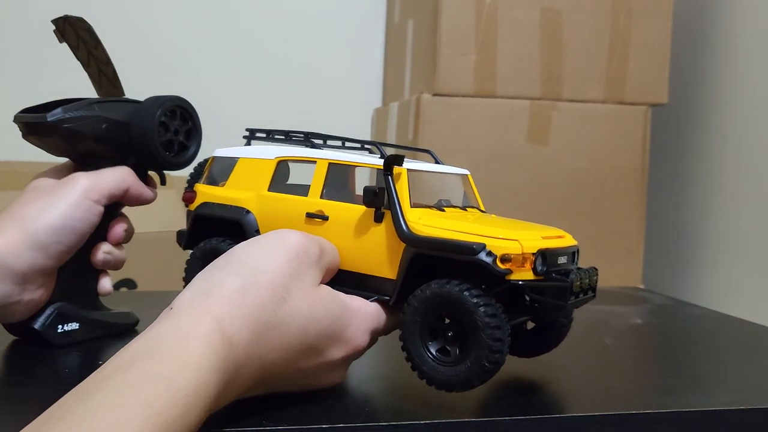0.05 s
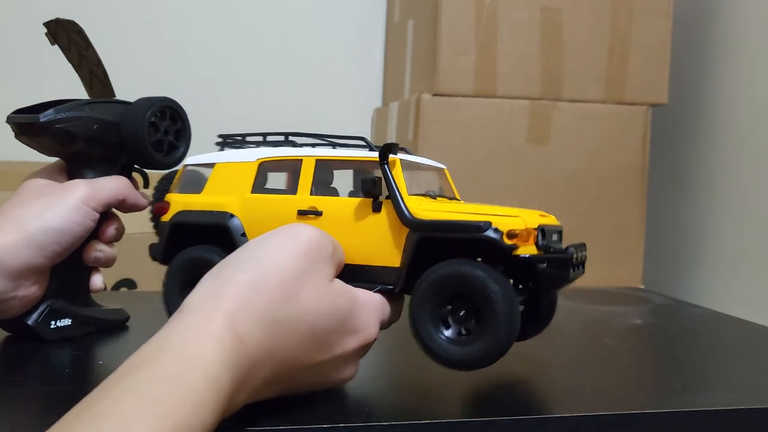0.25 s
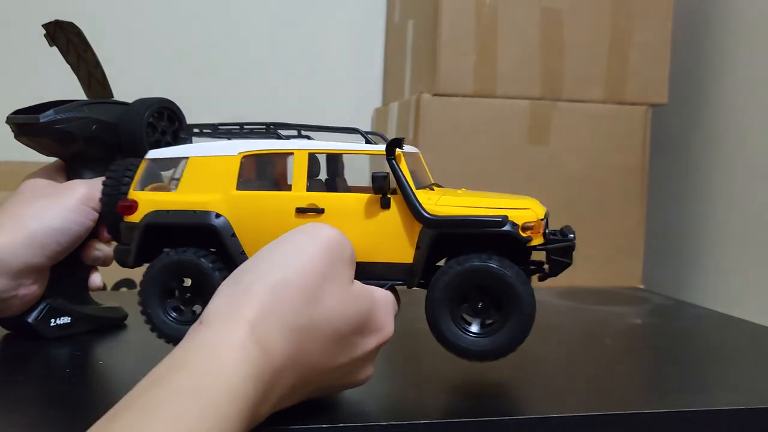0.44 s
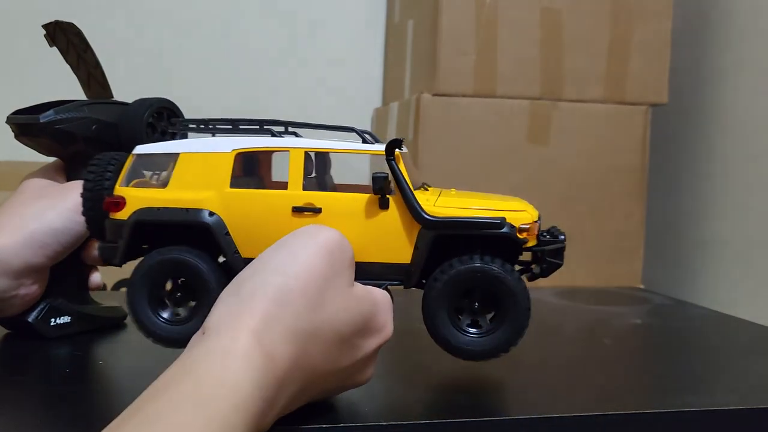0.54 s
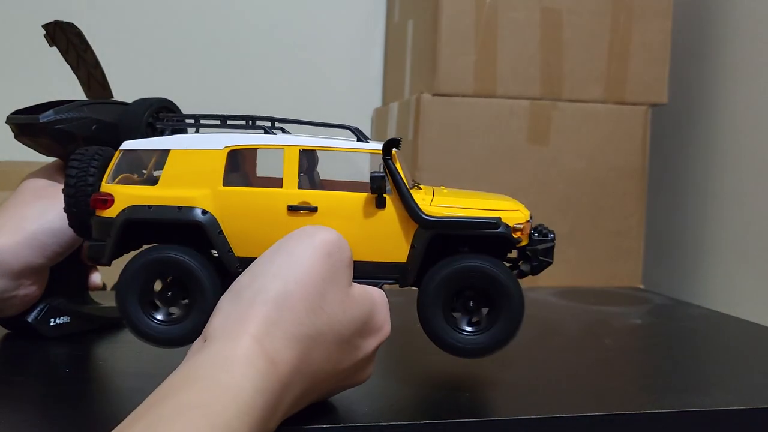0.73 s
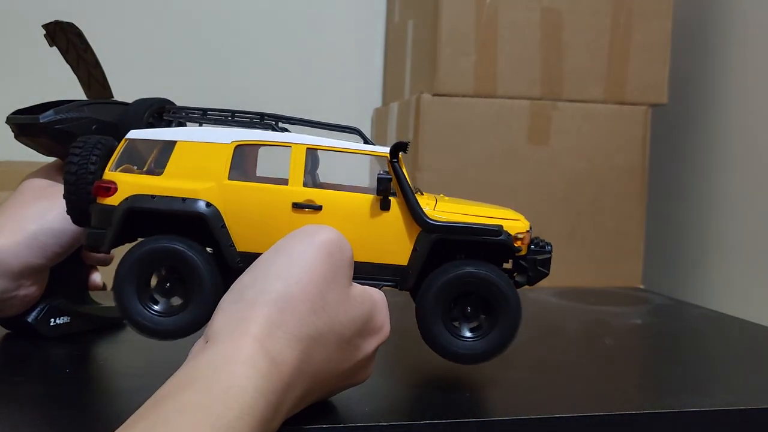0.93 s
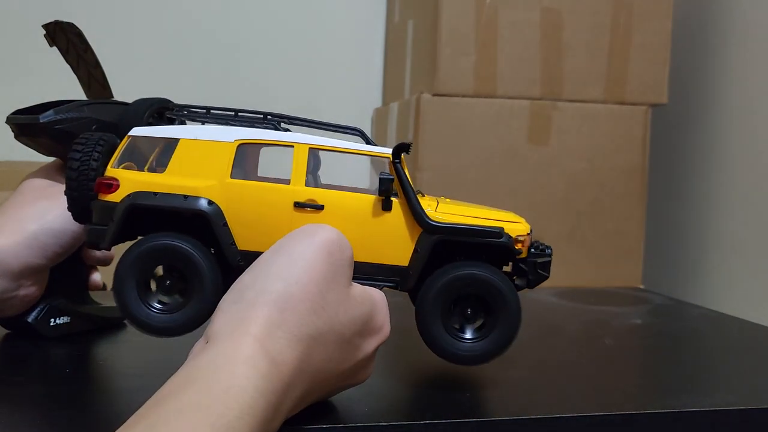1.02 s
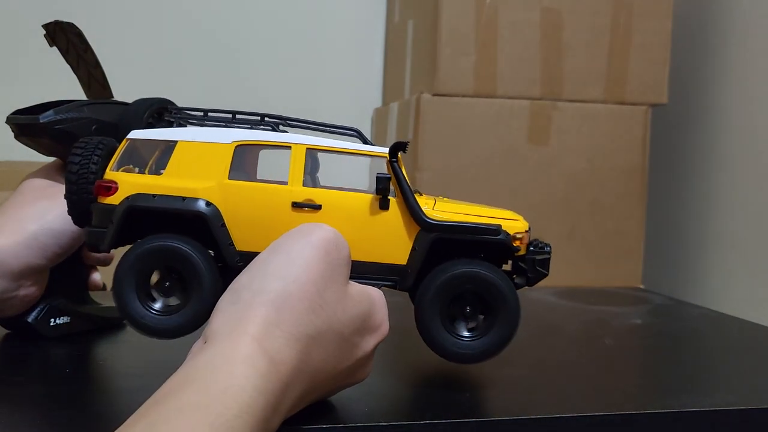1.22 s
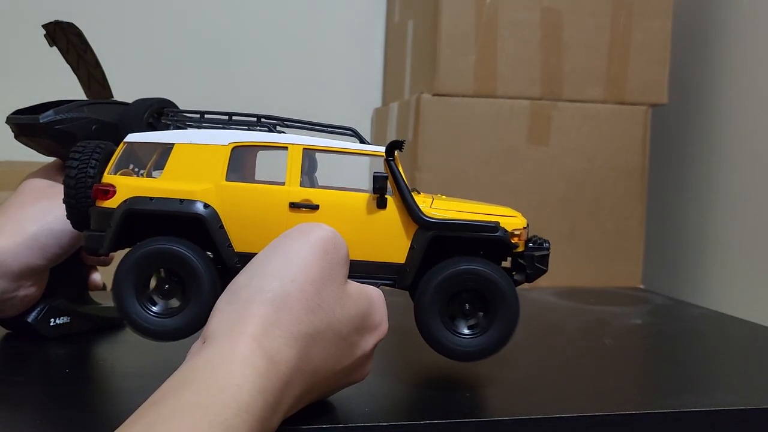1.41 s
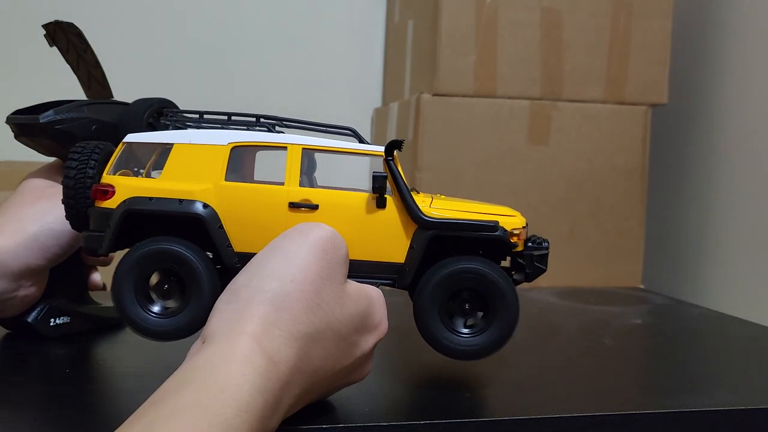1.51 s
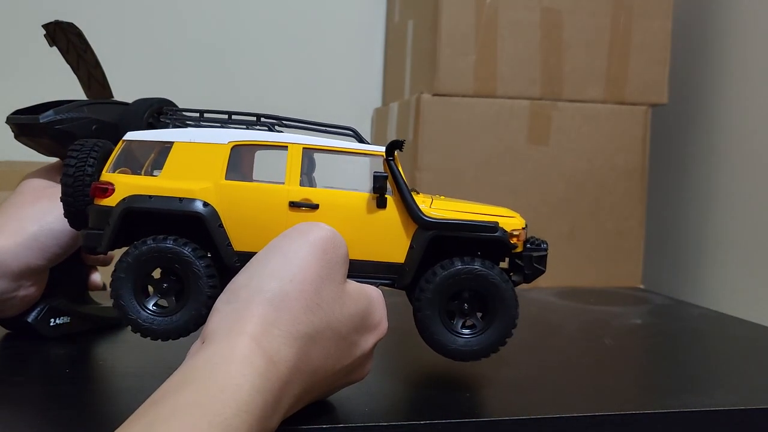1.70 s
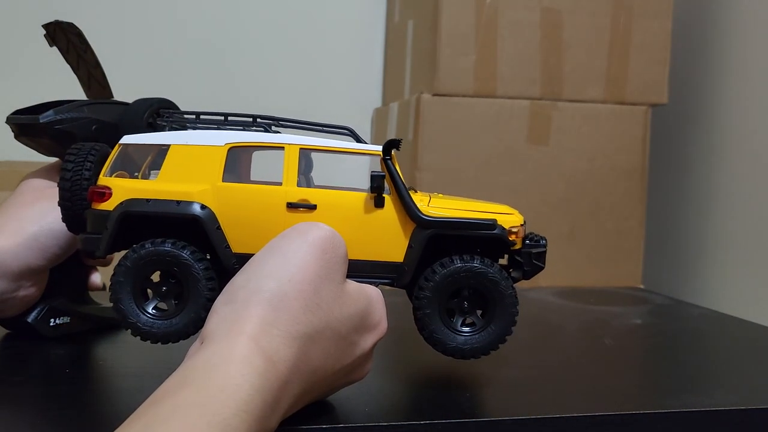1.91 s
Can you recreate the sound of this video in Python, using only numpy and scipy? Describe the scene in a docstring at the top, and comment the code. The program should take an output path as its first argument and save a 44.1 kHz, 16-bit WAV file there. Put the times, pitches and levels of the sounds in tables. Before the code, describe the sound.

After a brief quiet room hum and soft knock, a small toy truck motor whirs up in three rising steps with raspy plastic gear rattle, holds a bright whine, then coasts down to near silence, close indoors.

```python
"""The motor of a small toy truck, held in the air indoors, runs up in three throttle steps and coasts down.
Sines at multiples of the shaft speed give its hum and the whine of a ten-tooth pinion;
noise coloured by the resonances of the plastic shell gives the gear rattle, and damped sines a soft knock.
A mains hum and noise rumble of the room lie below, and the motor stirs again at the very end."""
import sys
import numpy as np
from scipy import signal
from scipy.fft import rfft, irfft
from scipy.io import wavfile
from scipy.ndimage import uniform_filter1d

SR = 44100
rng = np.random.default_rng(int(sys.argv[2]) if len(sys.argv) > 2 else 0)


def master_out(mix):
    """Clip the mix to full scale and print it as 16-bit PCM to the path in sys.argv[1]."""
    frames = np.transpose(np.atleast_2d(mix))
    ceiling = np.clip(frames, -1, 1)
    pcm = np.round(ceiling * 32767).astype(np.int16)
    wavfile.write(sys.argv[1], SR, pcm)


N = 85995
TIME_S = np.arange(N) / SR

# Room rumble spectrum: (frequency [Hz], relative density [dB per Hz])
RUMBLE_SPECTRUM = [(20, -34), (40, -20), (60, -8.5), (85, -17), (123, -6), (170, -18.5), (290, -10),
                   (450, -28), (800, -27.5), (1200, -33), (1800, -38.5), (2500, -30), (3500, -38.5),
                   (5500, -35.5), (9000, -36.5), (15900, -49.5)]
# Room rumble: (time [s], level [dB])
RUMBLE_LEVEL = [(0, -66), (.06, -59), (.3, -65), (1.6, -62), (1.8, -71), (1.95, -81)]
# Low modes of the knocked shell: (frequency [Hz], relative level [dB], 60 dB decay time [s])
KNOCK_MODES = [(284.4, 3.5, 0.34), (452, 8, 0.12), (793, 7, 0.092)]
# Rotor: (time [s], shaft speed [Hz], first order [dB], second order [dB], fourth order [dB]), before lean and blur
SHAFT = [(0.19, 110.3, -83, -66, -86), (0.256, 173.9, -67, -60, -46), (0.288, 179.4, -63, -79, -49),
         (0.308, 196.5, -63, -79, -49), (0.36, 199, -69, -95, -61), (0.414, 175.7, -74, -79, -46.5),
         (0.445, 127.4, -80, -62.5, -52), (0.55, 126.3, -100, -61, -56.5), (0.606, 229.2, -61, -74, -50),
         (0.63, 259.4, -51, -45, -66), (0.71, 271.6, -51.5, -44, -53), (0.79, 263, -50.5, -42.5, -57),
         (0.834, 240.7, -56.5, -54, -50), (0.88, 243.1, -64, -44.5, -58.5), (0.938, 241.9, -58, -91, -59),
         (0.96, 250.6, -52.5, -49, -55), (1.011, 326, -53, -48, -58.5), (1.022, 349.1, -39.5, -35, -72),
         (1.045, 366.4, -35, -43.5, -60), (1.056, 380.4, -36.5, -35, -54.5), (1.172, 379.2, -38, -35, -63),
         (1.592, 378.1, -36, -35.5, -58.5), (1.612, 352, -35, -44, -61), (1.622, 344.6, -61, -46, -52),
         (1.637, 346.3, -42, -37.5, -52), (1.646, 320, -60, -63, -52), (1.685, 246.9, -62, -50.5, -64),
         (1.71, 225.2, -82, -66, -80), (1.758, 199.2, -99, -69, -95)]
# Gear noise: (time [s], reference level [dB], low-mid level relative to it [dB])
GEAR_LOAD = [(0.192, -56.5, -2), (0.216, -47.5, 1.5), (0.25, -40.5, -3), (0.342, -43.5, -1.5),
             (0.494, -54, 3.5), (0.554, -50, 2.5), (0.572, -38, -8.5), (0.592, -40.5, -1), (0.608, -36, -6),
             (0.622, -40, -4), (0.91, -42, -9.5), (0.97, -39, -4), (1.034, -36, -10.5), (1.092, -41, -8),
             (1.234, -39, -10), (1.258, -41.5, -9), (1.606, -39, -7.5), (1.656, -43, -1.5),
             (1.802, -79.5, 2), (1.9, -82.5, -12), (1.934, -77, 8.5), (1.95, -62, -1.5)]
# Higher shaft orders: (multiple [-], part throttle [dB re gear reference], full throttle [dB re gear reference])
UPPER_ORDERS = [(3, -17, -30), (5, -19, -28), (6, -25, -20), (7, -19, -28), (8, -18, -28), (10, -14, -16),
                (10.5, -34, -23), (11, -22, -21), (12, -28, -22), (13, -32, -17), (14, -30, -21),
                (14.33, -34, -17), (15.67, -34, -23), (17, -27, -16), (20, -14, -11), (21, -23, -30),
                (22, -20, -28), (24, -22, -16), (24.33, -30, -21), (25, -28, -20), (26, -23, -28),
                (30, -20, -36), (39, -26, -25), (40, -30, -23), (41, -30, -27)]
# Prominence added to the higher orders: (time [s], other orders [dB], order ten [dB], order twenty [dB])
MESH_PROMINENCE = [(.2, -5, 0, -8), (.3, 0, 10.5, -9), (.36, 2, 6, -4), (.43, -15, -12, -4),
                   (.55, -16, -8, -8), (.62, 2, 11, -2), (.68, -3, 2, -0.5), (.79, 5, 12, 18),
                   (.84, 3, 13.5, -17), (.95, 4.5, 11.5, -13), (1.07, 1.5, 5.5, 1), (1.9, 3.5, 9, -3.5)]
# Noise around the tooth-mesh orders: (multiple [-], level at steady speed [dB re gear reference])
MESH_HISS = [(10, -25), (20, -11), (30, -21)]
# Gear rattle spectrum ahead of the shell: (frequency [Hz], relative density [dB per Hz])
RATTLE_SPECTRUM = [(530, -42), (900, -7), (1790, -2), (2060, -2), (2820, -7), (3670, -6.5), (4350, -8.5),
                   (7290, -2), (8320, -8), (9390, -5.5), (11900, -15), (15200, -20.5), (15900, -10.5)]
# Low drive-train rattle spectrum ahead of the shell: (frequency [Hz], relative density [dB per Hz])
GROWL_SPECTRUM = [(200, -9.5), (260, -5), (500, 4), (950, -4), (1300, -41)]
# Low drive-train rattle: (time [s], level [dB])
GROWL_LEVEL = [(0, -71.5), (.09, -70.5), (.18, -59), (.25, -45), (.35, -49.5), (.45, -55), (.55, -53.5),
               (.6, -45.5), (.7, -56), (.9, -57.5), (1, -49), (1.1, -52.5), (1.6, -51), (1.66, -44),
               (1.75, -66), (1.9, -95), (1.95, -64.5)]
# Shell resonances: (frequency [Hz], width [Hz], relative strength [dB])
SHELL_MODES = [(240, 37, -10.5), (305.5, 17, 1), (438.6, 18.6, 4), (529.3, 17, -2), (695, 16.7, 0.5),
               (769, 51, 0), (1850, 16, -9), (2090, 27, 0.5), (2654, 32, -3.5), (3290, 22, -4),
               (5290, 140, -2), (6410, 71, -4), (6950, 67, -4.5), (8900, 380, -20)]
# Stereo noise: (frequency [Hz], left-right correlation [-])
LIKENESS = [(60, 0.72), (500, 0.96), (1000, 0.05), (5000, 0.019), (15000, 0.043)]
# Stereo balance: (frequency [Hz], left minus right [dB])
LEFT_LEAN = [(60, -1), (130, -5), (290, 6), (640, -3), (1410, 1), (3100, 0), (6820, 4), (15000, -4.5)]

HUM_HZ, HUM_DB, HUM_WAVER_DB = 119.5, 0.5, 1.5  # peak level relative to rumble rms
ROOM_T60_S, ROOM_DB = 0.3, -12
KNOCK_S, KNOCK_DB, KNOCK_RISE_S = 0.081, -53.5, 0.02
START_S, START_RISE_S, STIR_S = 0.19, 0.0025, 0.036  # the gears catch; their lower rattle stirs earlier
RESTART_S, RESTART_HZ, RESTART_DB, RESTART_RISE_S = 1.92, 243, -72, 0.03
HALF_HZ, FULL_HZ = 270, 370  # shaft speeds of part and full throttle
SPEED_JITTER = 0.00086  # relative spread of shaft speed
FIRST_LEAD_RAD, LOW_LEAD_RAD = 0.25, 0.3  # left leads on order one, and on orders two and four
TONE_SPREAD_RAD = 1.9  # left-right phase scatter of the higher orders
UPPER_DB, RASP_DB = 0.5, -28  # trim of all higher orders; orders 33 to 38 at full throttle, before it
BLUR_DB_S = 3.5  # loss per unit of relative speed change a second
WAVER_DB, WAVER_PER_S = 3, 16
LINE_ROUGH, ROUGH_PER_S = 0.8, 60  # quick flutter that widens the higher orders
MESH_HISS_HZ, HISS_GAIN_DB_S = 160, 1.6  # modulator rate; swell with relative speed change a second
GATE_DEPTH = 0.077  # modulation of the rattle once per turn
CUTOFF_HZ = 15680


def amp(db):
    """A level in decibels is twenty times the logarithm of amplitude."""
    return 10 ** (np.asarray(db) / 20)


def unit(x):
    """Division by the root mean square gives unit effective value."""
    return x / np.sqrt(np.mean(x ** 2) + 1e-20)


def in_time(rows):
    """Linear interpolation turns each column into a continuous time course."""
    seconds, *columns = np.transpose(rows)
    return [np.interp(TIME_S, seconds, column) for column in columns]


def at_hz(points, hz):
    """Values are interpolated on a logarithmic frequency axis."""
    table_hz, values = np.array(points).T
    return np.interp(np.log(hz), np.log(table_hz), values)


def drift(rate):
    """Two-pole low-passed noise wanders at random with unit spread."""
    step = 40  # samples between computed points
    pole = np.exp(-2 * np.pi * rate * step / SR)
    noise = rng.standard_normal(N // step + 1002)
    slow = signal.lfilter([1], [1, -2 * pole, pole * pole], noise)[1000:]
    return np.interp(np.arange(N) / step, np.arange(len(slow)), unit(slow))


def lean(hz):
    """A level difference between channels sets the left and right gains at a frequency."""
    return amp(at_hz(LEFT_LEAN, hz) * np.array([[0.5], [-0.5]]))


def shell_gain(f):
    """Resonances add as Lorentzian power peaks to the direct sound of the shell."""
    power = 1
    for hz, width, db in SHELL_MODES:
        power = power + amp(2 * (db + 9.5)) / (1 + (2 * (f - hz) / width) ** 2)
    return np.sqrt(power)


def coloured(spectrum, low, high, resonant, excite=1.0):
    """Spectral weighting of white noise gives partly correlated stereo noise of unit rms."""
    white = rng.standard_normal((2, N)) * excite
    f = np.maximum(np.fft.rfftfreq(N, 1 / SR), 1)
    gain = amp(at_hz(spectrum, f))
    if resonant:
        gain = gain * shell_gain(f)
    alike = np.clip(at_hz(LIKENESS, f), 0, 1)
    mid, side = rfft(white) * gain
    common = np.sqrt(1 + alike) * mid
    opposed = np.sqrt(1 - alike) * side * np.array([[1], [-1]])
    in_band = (f >= low) & (f < high)
    return unit(irfft((common + opposed) * lean(f) * in_band, N))


def tones(turns, order, db, lead):
    """A shaft order is a sine whose phase follows the accumulated turns."""
    phase = 2 * np.pi * (order * turns + rng.random())
    return np.sqrt(2) * amp(db) * np.sin(phase + lead * np.array([[0.5], [-0.5]]))


def background():
    """Steady-spectrum noise and an amplitude-modulated mains sine share one level course."""
    level_db, = in_time(RUMBLE_LEVEL)
    hum = amp(HUM_DB + HUM_WAVER_DB * drift(29.0)) * np.sin(2 * np.pi * HUM_HZ * TIME_S)
    rumble = coloured(RUMBLE_SPECTRUM, 20, 16500, False)
    return amp(level_db) * (rumble + hum)


def room(x):
    """Reverberation is convolution with exponentially decaying noise, independent in each channel."""
    t = np.arange(SR // 2) / SR
    tail = rng.standard_normal((2, len(t))) * amp(-60 * t / ROOM_T60_S) * (t > 0.004)
    tail = tail / np.sqrt(np.sum(tail ** 2, axis=1, keepdims=True))
    return signal.fftconvolve(x, tail, axes=1)[:, :N]


def knock():
    """A soft blow in the hand excites damped free vibration in three low shell modes."""
    t = np.maximum(TIME_S - KNOCK_S, 0)
    rise = 1 - np.exp(-t / KNOCK_RISE_S)
    ring = 0
    for hz, db, t60 in KNOCK_MODES:
        ring = ring + amp(KNOCK_DB + db - 60 * t / t60) * rise * np.sin(2 * np.pi * hz * t)
    return ring


def gear_rattle(turns, reference_db, mid_db):
    """Random tooth impacts excite the shell, modulated once per turn above 900 Hz."""
    low_db, = in_time(GROWL_LEVEL)
    gate = 1 + GATE_DEPTH * np.cos(2 * np.pi * turns)
    caught = np.clip((TIME_S - START_S) / START_RISE_S, 0, 1)
    stirred = np.clip((TIME_S - START_S) / STIR_S + 1, 0, 1) ** 2
    treble = caught * amp(reference_db + 1.5) * coloured(RATTLE_SPECTRUM, 3200, 18500, True, gate)
    low_mid = stirred * amp(reference_db + mid_db) * coloured(RATTLE_SPECTRUM, 900, 3200, True, gate)
    growl = amp(low_db) * coloured(GROWL_SPECTRUM, 200, 1200, True)
    return treble + low_mid + growl


def mesh_hiss(hz, turns, change, reference_db):
    """Random amplitude modulation spreads each mesh order into a noise band, swelling as speed changes."""
    swell_db = HISS_GAIN_DB_S * change * (hz / FULL_HZ) ** 2
    hiss = 0
    for order, db in MESH_HISS:
        modulator = np.array([drift(MESH_HISS_HZ), drift(MESH_HISS_HZ)])
        hiss = hiss + tones(turns, order, reference_db + db + swell_db, 1.0) * modulator
    return hiss


def rotor_hum(turns, change, first_db, second_db, fourth_db):
    """Periodic rotor forces radiate at one, two and four times the shaft speed."""
    first = tones(turns, 1, first_db, FIRST_LEAD_RAD) * lean(380.0)
    second = tones(turns, 2, second_db, LOW_LEAD_RAD) * lean(760.0)
    wavering_db = fourth_db - change + WAVER_DB * drift(WAVER_PER_S)
    return first + second + tones(turns, 4, wavering_db, LOW_LEAD_RAD)


def pinion_whine(hz, turns, change, reference_db):
    """Tooth meshing makes a line spectrum of shaft orders, weakened while the speed changes."""
    other_db, ten_db, twenty_db = in_time(MESH_PROMINENCE)
    throttle = np.clip((hz - HALF_HZ) / (FULL_HZ - HALF_HZ), 0, 1)
    rasp = [(order, RASP_DB - 9, RASP_DB) for order in range(33, 39)]
    whine = 0
    for order, part_db, full_db in list(UPPER_ORDERS) + rasp:
        level_db = reference_db + UPPER_DB + part_db + throttle * (full_db - part_db)
        level_db = level_db - BLUR_DB_S * change + WAVER_DB * drift(WAVER_PER_S)
        level_db = level_db + {10: ten_db, 20: twenty_db}.get(order, other_db)
        flutter = 1 + LINE_ROUGH * drift(ROUGH_PER_S)
        lead = TONE_SPREAD_RAD * rng.standard_normal()
        whine = whine + flutter * lean(order * FULL_HZ) * tones(turns, order, level_db, lead)
    return whine


def motor():
    """Integrated shaft speed gives the common phase of hum, whine, mesh hiss and rattle modulation."""
    hz, first_db, second_db, fourth_db = in_time(SHAFT)
    reference_db, mid_db = in_time(GEAR_LOAD)
    # smoothed relative speed change [1/s]
    change = uniform_filter1d(np.abs(np.gradient(np.log(hz))) * SR, size=800)
    again = np.clip((TIME_S - RESTART_S) / RESTART_RISE_S, 0, 1)
    hz = np.where(again > 0, RESTART_HZ, hz) * (1 + SPEED_JITTER * drift(20))
    turns = np.cumsum(hz) / SR
    running = (TIME_S > SHAFT[0][0]) & (TIME_S < SHAFT[-1][0])
    orders = rotor_hum(turns, change, first_db, second_db, fourth_db)
    orders = orders + pinion_whine(hz, turns, change, reference_db)
    orders = orders + mesh_hiss(hz, turns, change, reference_db)
    restart = again * sum(tones(turns, order, RESTART_DB, rng.normal()) for order in range(1, 11))
    return running * orders + restart + gear_rattle(turns, reference_db, mid_db)


def scene():
    """Direct and reverberant sound of the truck superpose on the background."""
    truck = motor() + knock()
    return truck + amp(ROOM_DB) * room(truck) + background()


def record(dry):
    """A steep elliptic low-pass filter removes the top of the spectrum."""
    low_pass = signal.ellip(12, 0.3, 75, CUTOFF_HZ, fs=SR, output="sos")
    return signal.sosfilt(low_pass, dry)


dry = scene()
out = record(dry)
master_out(out)
```